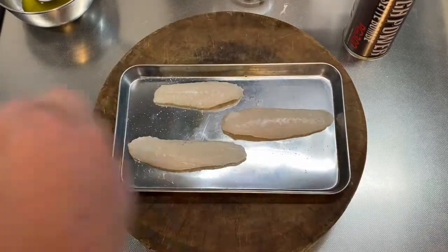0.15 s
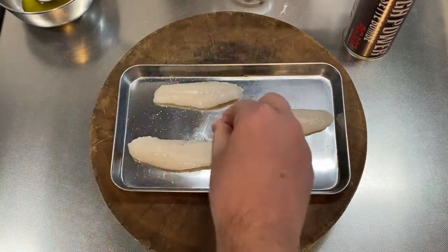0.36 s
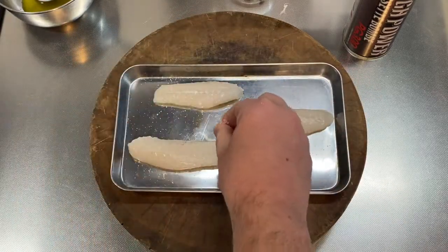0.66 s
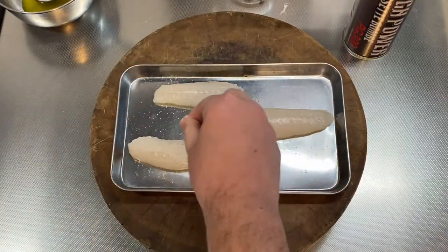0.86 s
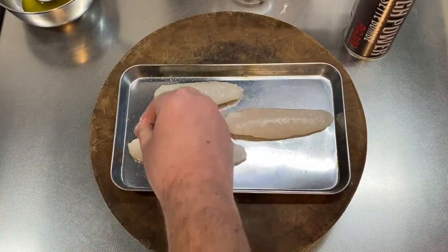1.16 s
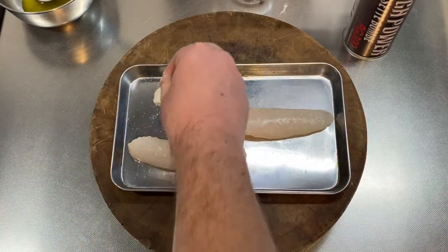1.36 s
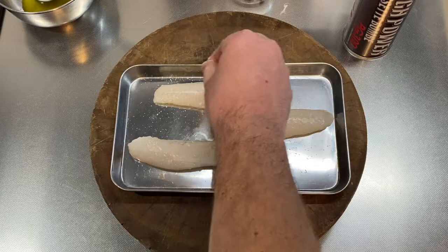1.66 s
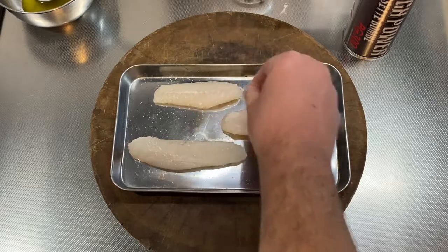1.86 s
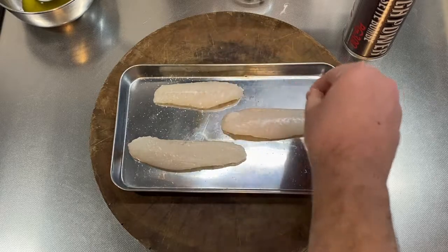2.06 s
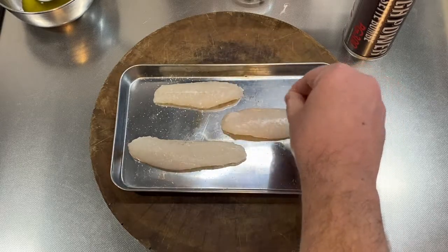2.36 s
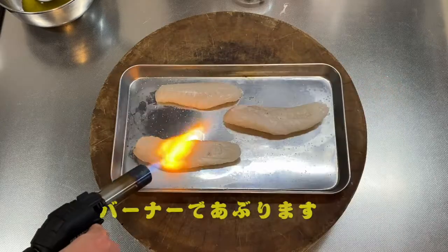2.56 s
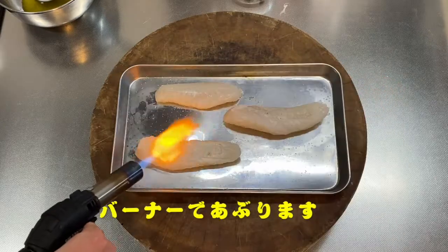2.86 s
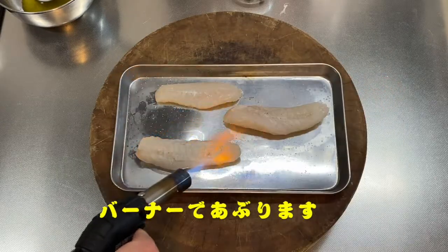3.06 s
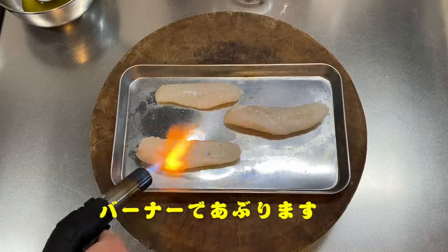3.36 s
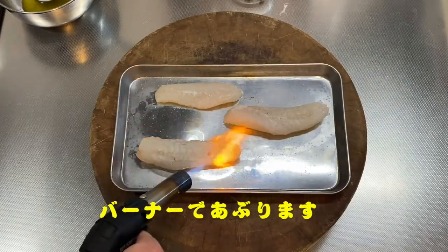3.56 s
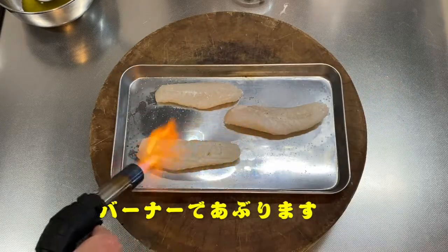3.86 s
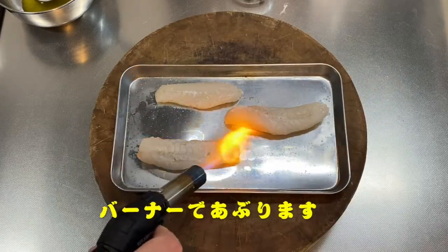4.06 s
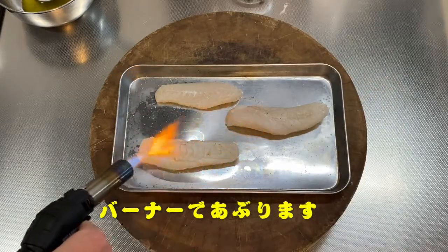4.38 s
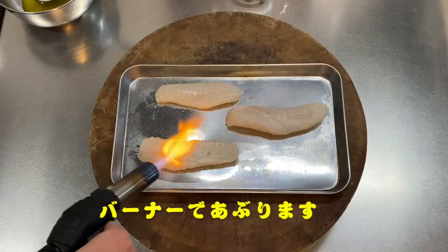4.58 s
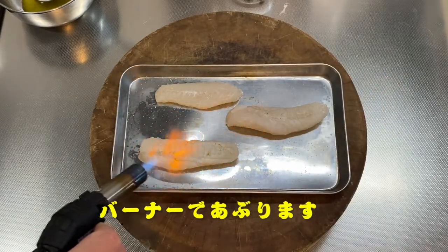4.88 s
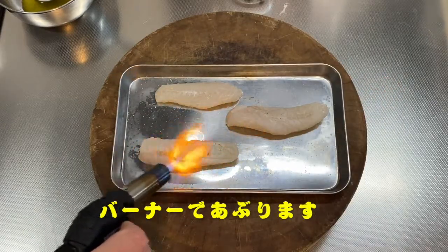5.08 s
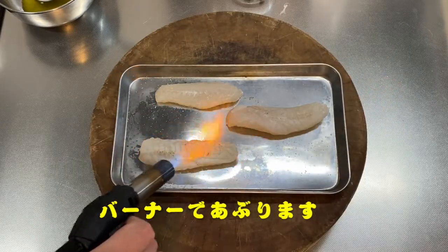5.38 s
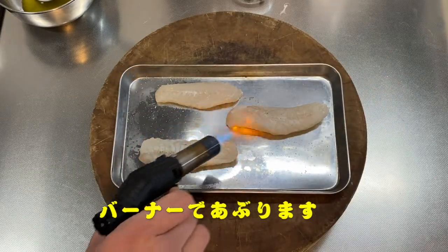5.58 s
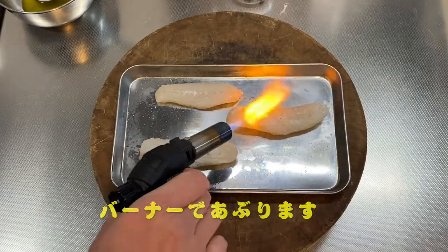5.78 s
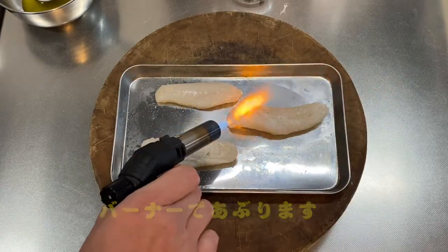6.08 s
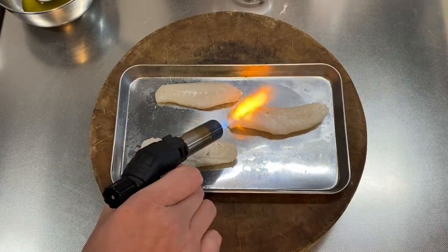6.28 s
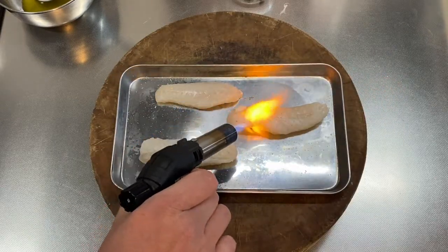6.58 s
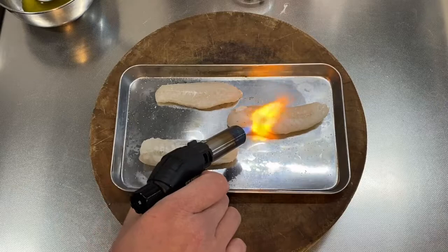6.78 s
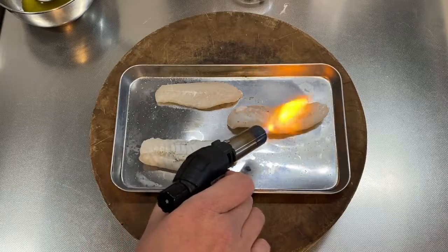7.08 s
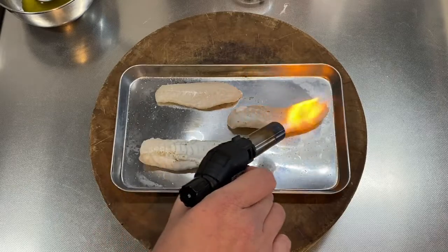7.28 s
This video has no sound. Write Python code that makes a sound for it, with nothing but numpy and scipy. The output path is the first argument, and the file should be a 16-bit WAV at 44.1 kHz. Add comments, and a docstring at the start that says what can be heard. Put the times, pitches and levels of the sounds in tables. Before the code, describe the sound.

Soft, crisp rubbing of salt between fingertips repeats about a dozen times, with a few tiny ticks on a metal tray over a faint low room rumble. Suddenly the much louder sound of a kitchen blowtorch takes over: a steady rushing flame with a hiss on top, its tone shifting slightly as it sweeps over fish fillets. Salt grains snap and crackle irregularly. Everything is heard from close overhead in a small kitchen.

```python
"""A quiet kitchen: fingers rub salt over fish on a steel tray, then the scene changes to a gas torch
roaring over the fillets. Friction between the grains makes a swish, and their impacts patter on the tray.
The flame's noise excites the hollows of tray, counter and room, the jet hisses through the nozzle tube,
and salt pops in the heat. A phone above hears it with two ports, the treble reaching the left first."""
import sys
import numpy as np
from scipy import signal
from scipy.fft import rfft, irfft, next_fast_len
from scipy.io import wavfile
from scipy.ndimage import uniform_filter1d

SR = 44100
rng = np.random.default_rng(int(sys.argv[2]) if len(sys.argv) > 2 else 0)


def generate_wav(signal):
    """Clip the signal to [-1, 1] and save it as 16-bit WAV at the path in sys.argv[1]."""
    frames = np.transpose(np.atleast_2d(signal))
    scaled = np.clip(frames, -1, 1) * 32767
    pcm = np.round(scaled).astype(np.int16)
    wavfile.write(sys.argv[1], SR, pcm)


N = 327663
T = np.arange(N) / SR
FFT_SIZE = next_fast_len(N + SR)
HZ = np.arange(FFT_SIZE // 2 + 1) * SR / FFT_SIZE + 1e-3
ANTIPHASE = np.array([[1], [-1]])  # left, right
IGNITION_S, IGNITION_RISE_S = 2.460, 0.0093


def undb(db):
    """Amplitude ratio of a level in decibels."""
    return 10 ** (np.asarray(db) / 20)


def level(x, db):
    """Normalisation to an rms level."""
    return x * undb(db) / np.sqrt(np.mean(x ** 2))


def curve(table, column=1):
    """Interpolation of a table's column over log frequency."""
    table = np.array(table)
    return np.interp(np.log(HZ), np.log(table[:, 0]), table[:, column])


def resonance(hz, width_hz):
    """Response of a damped oscillator, with gain 1 at its centre."""
    return 1j * HZ * width_hz / (hz ** 2 - HZ ** 2 + 1j * HZ * width_hz)


def steep_resonance(hz, width_hz):
    """Two resonances in cascade, at zero phase: the same half-power width, steeper flanks."""
    return np.abs(resonance(hz, width_hz / np.sqrt(np.sqrt(2) - 1))) ** 2


def filtered(x, response):
    """Linear filtering: the spectrum is multiplied by a frequency response."""
    return irfft(rfft(x, FFT_SIZE) * response, FFT_SIZE)[..., :N]


def noise():
    """White Gaussian noise."""
    return rng.standard_normal(N)


def wander(rate_hz):
    """Random modulation: held values, smoothed twice, with a spread near 1."""
    hold = int(SR / rate_hz)
    steps = np.repeat(rng.standard_normal(N // hold + 1), hold)
    return 1.3 * uniform_filter1d(uniform_filter1d(steps, hold), hold)[:N]


def impulses(times_s, sizes):
    """Impulse train with the given times and sizes."""
    x = np.zeros(N)
    np.add.at(x, np.minimum((np.asarray(times_s) * SR).astype(int), N - 1), sizes)
    return x


def driven_modes(drive, modes, reach, drift_db, drift_hz):
    """Forced resonance: one source drives all modes; each gain follows the reach and drifts alone."""
    spectrum, out = rfft(drive, FFT_SIZE), 0
    for hz, width_hz, near_db, far_db in modes:
        db = near_db + reach * (far_db - near_db) + drift_db * wander(drift_hz)
        out += irfft(spectrum * steep_resonance(hz, width_hz), FFT_SIZE)[:N] * undb(db)
    return out


def kitchen_rumble():
    """Ambient noise swells with the moving arm; partial decorrelation widens it above 150 Hz."""
    # Each row: time in seconds, level below 150 Hz in dB, level above 150 Hz in dB.
    swells = [(0.0, -66, -64), (0.22, -67, -84), (0.42, -70, -70), (0.5, -62, -67), (0.78, -69.5, -70),
              (1.03, -63, -71), (1.18, -75, -80), (1.45, -74.5, -78), (1.66, -66, -75), (1.77, -76, -73.5),
              (1.88, -67, -76), (2.12, -69, -85), (2.33, -67, -71), (2.35, -77, -83), (2.38, -65, -69),
              (2.45, -70, -67)]
    # Each row: frequency in Hz, relative spectral density in dB.
    spectrum = [(15, -42), (25, -9), (75, -0.5), (142, -8), (238, -5.5), (318, -14.5), (578, -19.5),
                (1090, -31), (2500, -35.5), (3250, -65), (5500, -120)]
    times_s, low_db, upper_db = np.transpose(swells)
    colour = undb(curve(spectrum))
    low = level(filtered(noise(), colour * (HZ < 150)), 0)
    mid, side = (level(filtered(noise(), colour * (HZ >= 150)), 0) for _ in range(2))
    upper = mid + .5 * side * ANTIPHASE
    return low * undb(np.interp(T, times_s, low_db)) + upper * undb(np.interp(T, times_s, upper_db))


def port_hiss():
    """Self-noise of the ports: a faint, slightly wavering hiss."""
    # Each row: frequency in Hz, relative spectral density in dB.
    spectrum = [(300, 10.5), (1500, 1), (4000, -4), (9000, -2.5), (16000, 1)]
    return level(filtered(noise(), undb(curve(spectrum))), -78.5) * undb(wander(5.7))


def salt_rubbing():
    """Granular friction and impact: a high swish between the fingers, a duller patter on the tray."""
    # One list per rub. Each row: time in seconds, swish gain in dB, patter gain relative to it in dB.
    rubs = [
        [(0.44, -100, 6), (0.452, -75, -7), (0.464, -88, 2), (0.51, -71.5, -14), (0.594, -82.5, 4),
         (0.698, -82, -8), (0.72, -100, -9)],
        [(0.77, -97, -2), (0.778, -82, -10), (0.814, -71, -13), (0.854, -79, -19), (0.884, -95, -2)],
        [(0.895, -94, -2), (0.903, -84, -19), (0.915, -74, -18), (0.953, -73, -8), (0.999, -92, -6)],
        [(1.001, -89, -11), (1.027, -77, -14), (1.053, -78, -18), (1.087, -93, -13)],
        [(1.107, -97, -6), (1.111, -89, -16), (1.149, -72, -18), (1.167, -76, -27), (1.201, -93, -11)],
        [(1.237, -96, -7), (1.243, -86, -17), (1.285, -78, -26), (1.321, -86, -16), (1.334, -95, -9)],
        [(1.366, -100, 3), (1.376, -80, -1), (1.408, -84, -15), (1.424, -100, -4)],
        [(1.436, -93, -13), (1.452, -73, -19), (1.492, -69, -17), (1.506, -72.5, -17), (1.552, -93, -15)],
        [(1.588, -90, -14), (1.6, -79, -9), (1.624, -73.5, -7), (1.676, -87, -17), (1.69, -89, -15)],
        [(1.686, -87, -16), (1.728, -73, -8), (1.762, -85, -11), (1.779, -97, 3)],
        [(1.799, -88, -13), (1.831, -72, -10), (1.921, -84, -20), (1.945, -71, -13), (1.993, -76, -7),
         (2.047, -83, -24), (2.073, -71, -17), (2.143, -73, -18), (2.191, -92, -14)],
        [(2.204, -94, -16), (2.232, -72, -20), (2.266, -69.5, -10), (2.314, -83, -14), (2.34, -95, -10)],
        [(2.352, -89, -14), (2.38, -72, -11), (2.45, -64, -12), (2.46, -72, 8), (2.47, -51, 9)],
    ]
    swish_gain, patter_gain = np.zeros(N), np.zeros(N)
    for rub in rubs:
        times_s, swish_db, patter_db = np.transpose(rub)
        swish_gain += np.interp(T, times_s, undb(swish_db), left=0, right=0)
        patter_gain += np.interp(T, times_s, undb(swish_db + patter_db), left=0, right=0)
    grit = undb(1.5 * wander(200) + 1.2 * wander(39.7))
    swish = level(filtered(grit * noise(), resonance(10900, 6300) ** 2), 4.2)
    patter = level(filtered(grit * noise(), resonance(4300, 6400) ** 2), 0.5)
    fade = int(.006 * SR)
    return uniform_filter1d(swish_gain, fade) * swish + uniform_filter1d(patter_gain, fade) * patter


def grain_ticks(decay_s=.003):
    """Impacts of lone grains on steel: bright noise bursts with exponential decay."""
    # Each row: start in seconds, peak gain in dB.
    ticks = [(0.4499, -65), (0.5953, -63), (1.3743, -64)]
    starts_s, gain_db = np.transpose(ticks)
    decay = np.exp(-np.arange(600) / (decay_s * SR))
    envelope = signal.fftconvolve(impulses(starts_s, undb(gain_db)), decay)[:N]
    return envelope * filtered(noise(), resonance(7000, 12000))


def flame_roar(reach):
    """Cavity resonance: a fluttering flame drives the hollows, each swelling as the torch wags."""
    # Each row: frequency in Hz, bandwidth in Hz, gain at the near fillet in dB, at the far ones in dB.
    hollows = [(60, 34, -21, -14), (91.4, 39, -6.5, -4.5), (161, 29, -13, -6), (189, 29, -8, -14),
               (228.3, 19.7, 6.5, 8), (267, 17, -19, -12), (353, 47, 5, 1), (404, 14, 0.5, -4.5),
               (484, 44, -7, -1.5), (513.6, 33, 1.5, 2.5), (619, 40, 1, 3), (732, 53, -11.5, -9),
               (866, 69, -2.5, -9.5), (971, 91, -7.5, 0.5), (1050, 73, -12.5, -1.5), (1230, 53, -13, -18.5),
               (1357, 100, -9, -16), (1485, 72, -5, -6.5), (1622, 80, -12.5, -10), (1833, 97, -11.5, -34),
               (1956, 51, -13.5, -25.5), (2270, 247, -17.5, -21.5), (2480, 175, -22, -35.5),
               (2630, 20, -11.5, -25), (3000, 450, -29, -14)]
    flame = noise() * undb(0.81 * wander(90))
    return level(driven_modes(flame, hollows, reach, drift_db=1.12, drift_hz=2.49), 0)


def jet_hiss(reach):
    """Jet turbulence radiates broadband noise and excites the resonances of the nozzle tube."""
    # Each row: frequency in Hz, relative spectral density in dB.
    jet_spectrum = [(2500, -40), (2950, -9), (4500, -8), (5750, -11.5), (7300, -11.5), (9300, -14),
                    (10400, -17.5), (13000, -18.5), (16000, -20.5)]
    # Each row: frequency in Hz, bandwidth in Hz, gain at the near fillet in dB, at the far ones in dB.
    tube_modes = [(3300, 230, -1, 0), (3550, 200, -3, -2), (3880, 280, -5, -4), (4200, 240, -8, -5),
                  (4950, 180, -10, -5), (5280, 240, -8, -7), (6250, 450, -7, -6), (6780, 500, -6.5, -7),
                  (9780, 280, -14, -9.5)]
    turbulence = noise() * undb(wander(150))
    broadband = filtered(noise(), undb(curve(jet_spectrum))) * undb(0.3 * wander(6.6))
    tube = driven_modes(turbulence, tube_modes, reach, drift_db=0.48, drift_hz=4.14)
    return level(broadband + tube, 0)


def salt_pops(small_count=300, fizz_decay_s=0.0035):
    """Impulsive bursts of heated grains: each clicks and fizzes, and the big ones also thud."""
    # Each row: start in seconds, gain in dB, relative gains of the top treble and of the thud in dB.
    big_pops = [(2.6903, -28, -4, 2), (2.7483, -21, -4, 2), (2.796, -21, -6, 2), (3.19, -25, -4, 2),
                (3.413, -30, -4, 2), (3.453, -26, -4, 2), (3.478, -21.5, -7, 2), (3.9734, -24, -6, 2),
                (4.271, -24, -4, 2), (4.564, -25, -4, 2), (4.677, -19, -6, 2), (4.7142, -27, -4, 2),
                (4.7711, -23, -7, 2), (5.466, -18, -6, 2), (5.469, -27, -4, 2), (5.5029, -29, -4, 2),
                (5.5114, -24, -4, 2), (5.5434, -42, -4, 2), (6.1294, -25, -4, 2), (6.159, -25, -4, 2),
                (6.5035, -22, -6, 2), (6.564, -23, -6, 2), (6.6662, -26, -4, 2), (6.7294, -50, -4, 2),
                (6.7894, -46, -4, 2), (7.2744, -39, -4, 2)]
    starts_s, gain_db, top_db, thud_db = np.transpose(big_pops)
    when, strength = rng.random((small_count, 2)).T
    small = impulses(IGNITION_S + when * (N / SR - IGNITION_S), undb(-54 + 16 * strength ** 4))
    fizz = rng.standard_normal(600) * np.exp(-np.arange(600) / (fizz_decay_s * SR))
    crack = np.r_[undb(7), undb(-8) * fizz]  # a one-sample click, then the fizz
    out = filtered(impulses(starts_s, undb(gain_db + thud_db)), resonance(3500, 4000) ** 2)
    for db, hz, width_hz in (gain_db, 9500, 8000), (gain_db + top_db, 14500, 6000):
        cracks = signal.fftconvolve(impulses(starts_s, undb(db)) + small, crack)[:N]
        out += filtered(cracks, resonance(hz, width_hz) ** 2)
    return out


def room_echoes(direct, t60_s=0.21, patterns=12):
    """Diffuse reflection from tray, counter and walls; the pattern changes as the hand moves."""
    # Each row: frequency in Hz, gain in phase at both ports in dB, gain in antiphase in dB.
    diffuse_field = [(250, -22, -38), (500, -13, -16), (800, -11, -13), (1500, -8, -16), (2500, -6, -17),
                     (4000, -6, -18), (7000, -10, -17), (16000, -14, -14)]
    mid_gain, side_gain = undb(curve(diffuse_field)), undb(curve(diffuse_field, column=2))
    decay = np.exp(-np.log(1000) * np.arange(SR // 2) / (t60_s * SR))
    decay /= np.sqrt(np.sum(decay ** 2))
    position = T / T[-1] * (patterns - 1)
    spectrum = 0
    for k in range(patterns):
        share = np.sqrt(np.clip(1 - abs(position - k), 0, 1))  # equal-power crossfade
        mid, side = rfft(rng.standard_normal((2, len(decay))) * decay, FFT_SIZE)
        spectrum += rfft(direct * share, FFT_SIZE) * (mid * mid_gain + side * side_gain * ANTIPHASE)
    return irfft(spectrum, FFT_SIZE)[:, :N]


def scene():
    """Superposition of direct sound and echoes; the torch replaces the salting and the background."""
    # Each row: time in seconds, roar level in dB, hiss relative to it in dB, reach (0 near, 1 far).
    torch_path = [(2.46, -30, -10, 0.031), (2.9, -28.5, -13, 0.19), (3.3, -29, -13, 0.083),
                  (3.7, -28.5, -12, 0.11), (4.101, -29, -11.5, 0.055), (4.5, -28.5, -12, 0.25),
                  (4.9, -28, -12.5, 0.24), (5.2, -28, -12, 0), (5.5, -28, -11.5, 0.26),
                  (5.8, -29.5, -11, 0.8), (6.2, -28, -11.5, 0.54), (6.6, -29, -12.5, 0.64),
                  (7.0, -28.5, -12, 0.41), (7.43, -29, -10.5, 0.32)]
    times_s, *columns = np.transpose(torch_path)
    roar_db, hiss_db, reach = (np.interp(T, times_s, column) for column in columns)
    lit = np.clip((T - IGNITION_S) / IGNITION_RISE_S, 0, 1)
    torch = undb(roar_db) * (flame_roar(reach) + undb(hiss_db) * jet_hiss(reach)) + salt_pops()
    direct = lit * torch + (1 - lit) * (salt_rubbing() + grain_ticks())
    return direct + room_echoes(direct) + (1 - lit) * (kitchen_rumble() + port_hiss())


def record(dry):
    """Acoustic shadow and phase lead: the phone's body shades its ports unequally; the left leads."""
    # Each row: frequency in Hz, left level minus right level in dB.
    shading = [(515, -2.5), (620, -3), (715, -9), (860, 6), (960, -1), (1050, -6.5), (1250, 4)]
    # Each row: frequency in Hz, phase lead of the left port in cycles.
    left_lead = [(3600, 0), (4300, .1), (5000, .02), (7250, .5), (10500, 1), (13450, 1.5), (16500, 2)]
    balance_db = curve([(430, 0)] + shading + [(1500, 0)])
    half = ANTIPHASE / 2
    ports = undb(half * balance_db) * np.exp(2j * np.pi * half * curve(left_lead))
    bass_cut = 1 / np.sqrt(1 + (40 / HZ) ** 4)
    treble_cut = signal.ellip(12, .2, 70, 15750, fs=SR, output="sos")
    return signal.sosfilt(treble_cut, filtered(dry, ports * bass_cut))


dry = scene()
out = record(dry)
generate_wav(out)
```